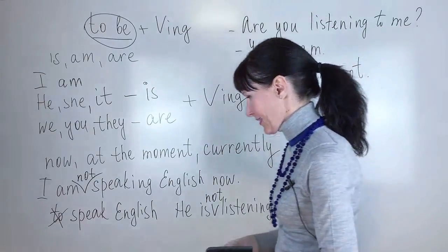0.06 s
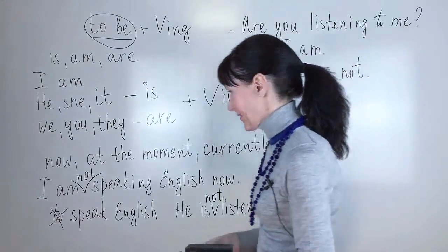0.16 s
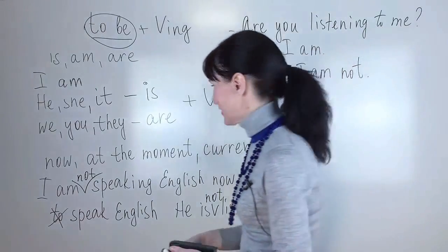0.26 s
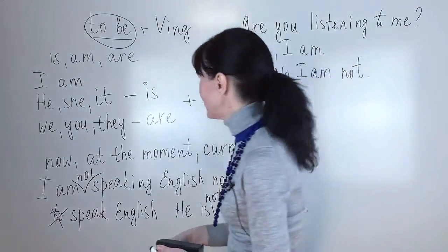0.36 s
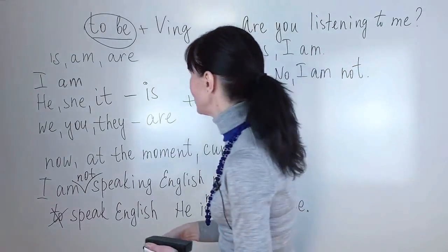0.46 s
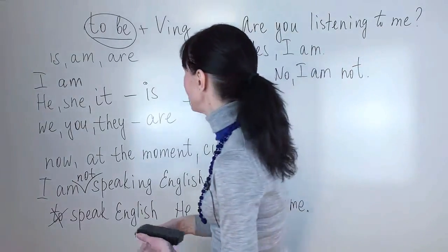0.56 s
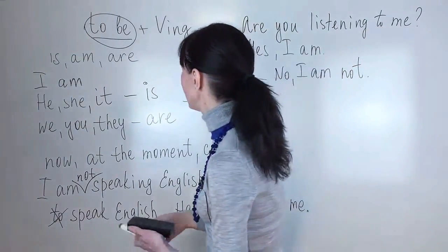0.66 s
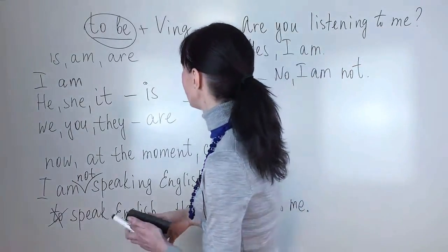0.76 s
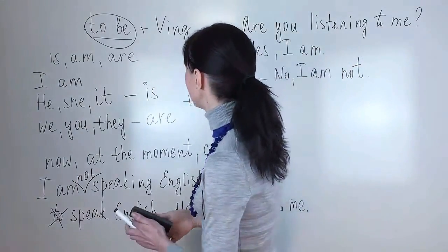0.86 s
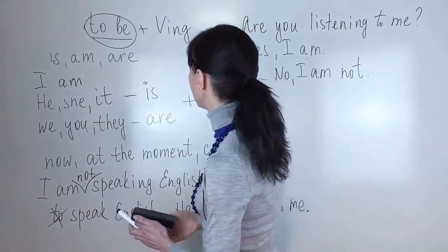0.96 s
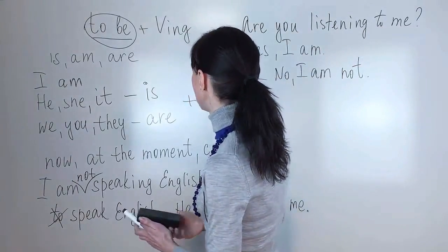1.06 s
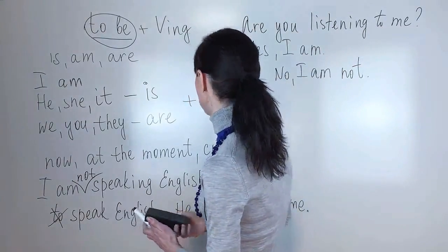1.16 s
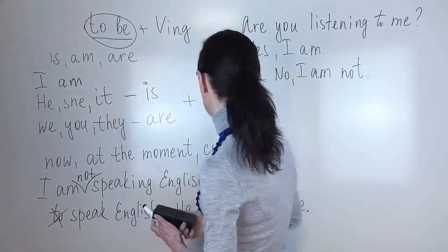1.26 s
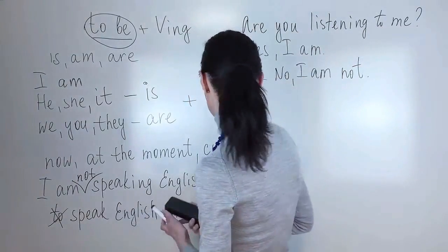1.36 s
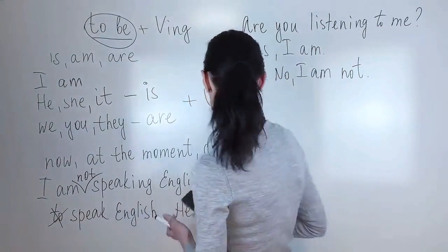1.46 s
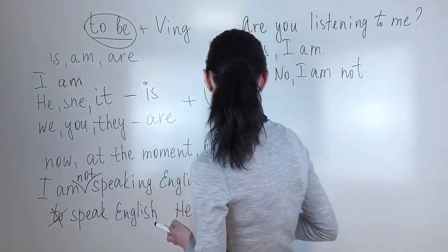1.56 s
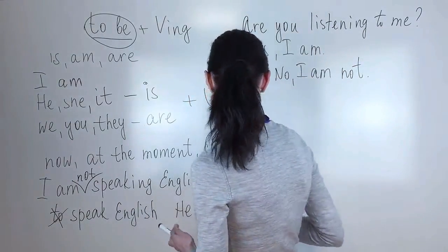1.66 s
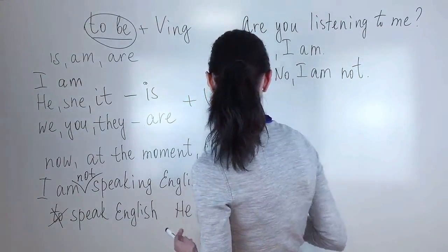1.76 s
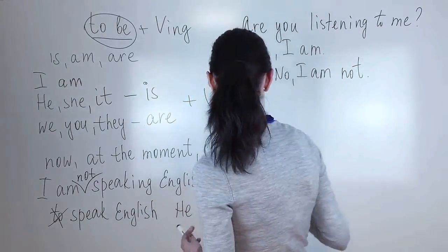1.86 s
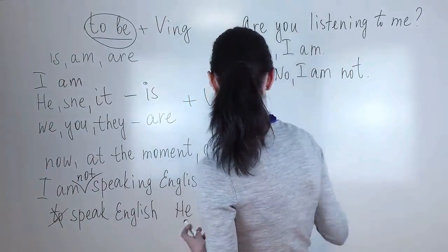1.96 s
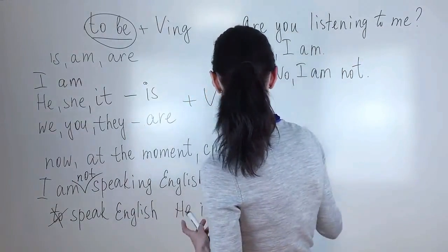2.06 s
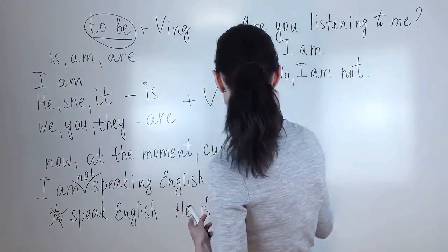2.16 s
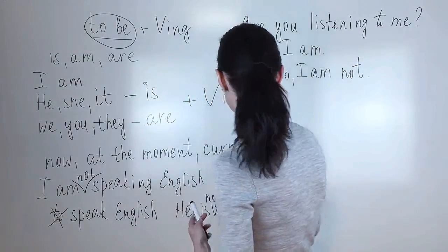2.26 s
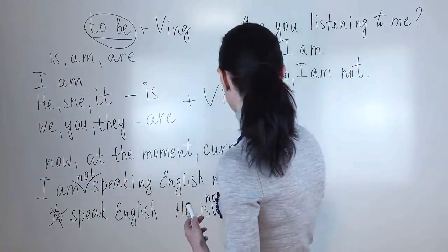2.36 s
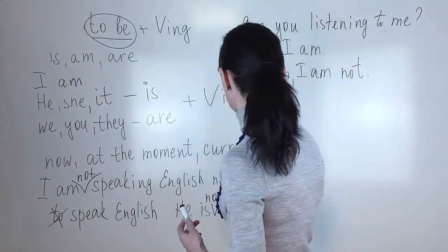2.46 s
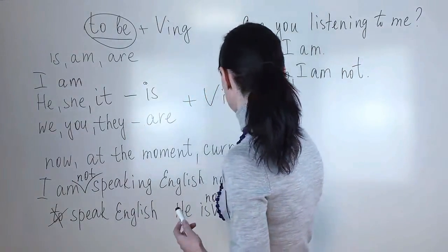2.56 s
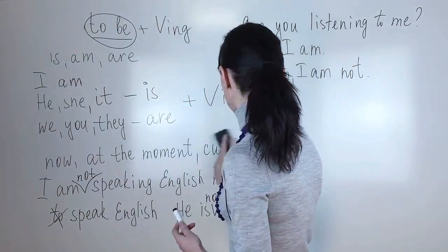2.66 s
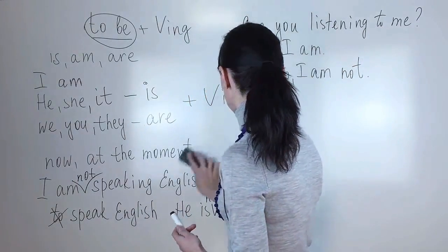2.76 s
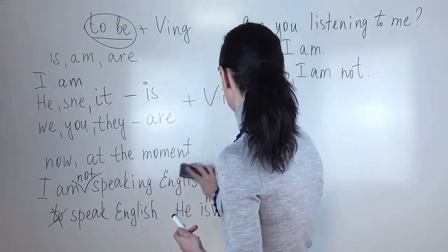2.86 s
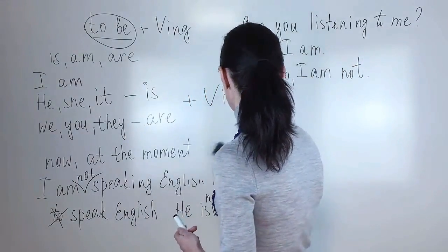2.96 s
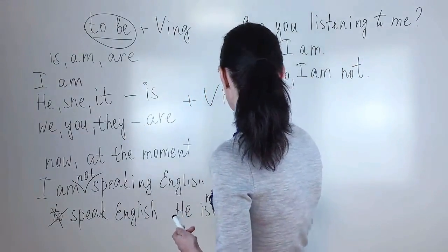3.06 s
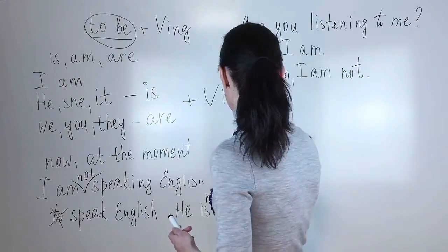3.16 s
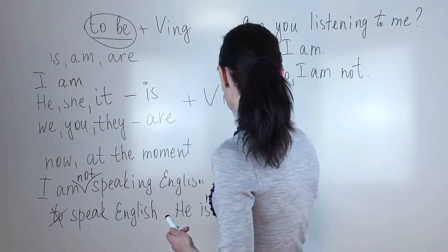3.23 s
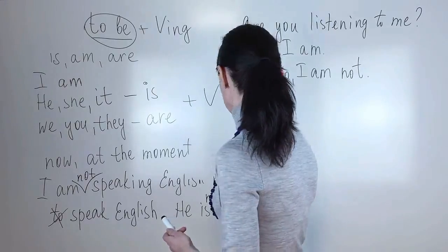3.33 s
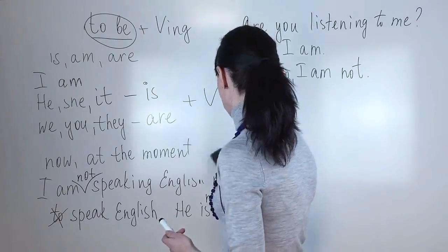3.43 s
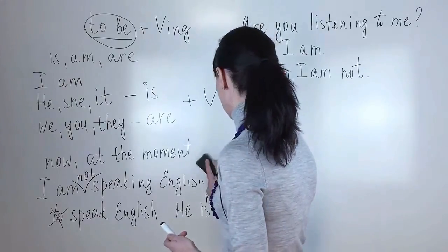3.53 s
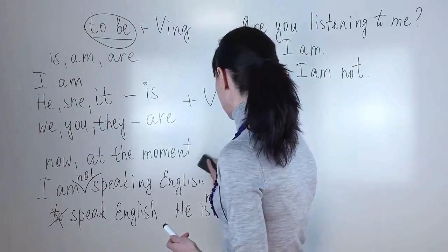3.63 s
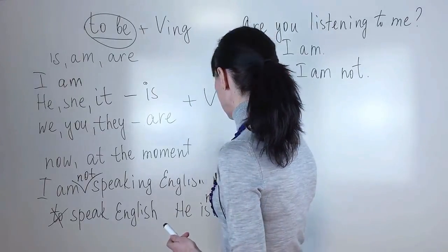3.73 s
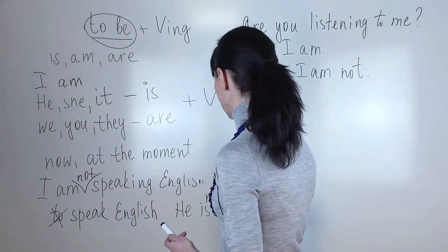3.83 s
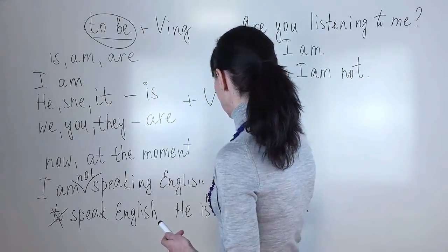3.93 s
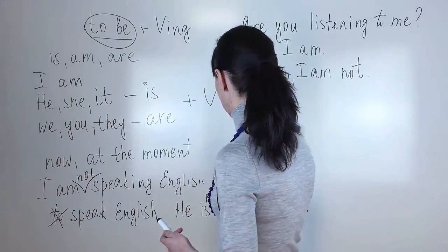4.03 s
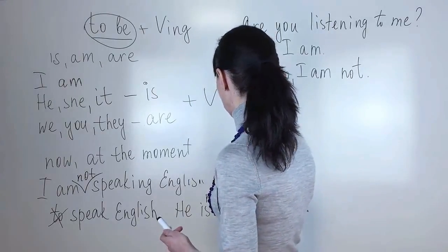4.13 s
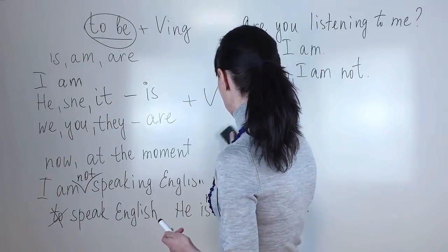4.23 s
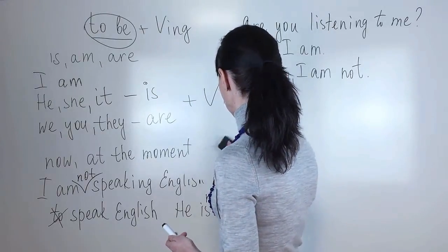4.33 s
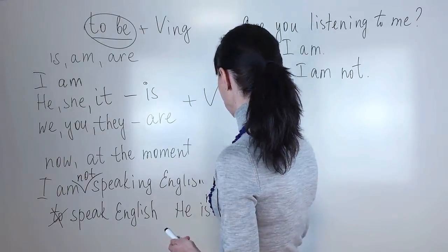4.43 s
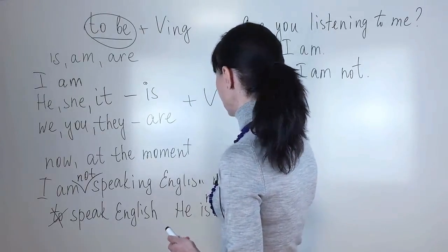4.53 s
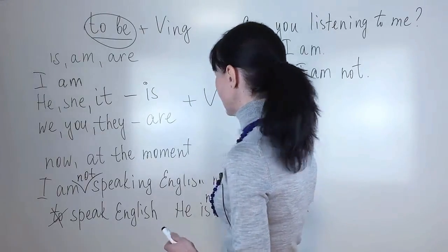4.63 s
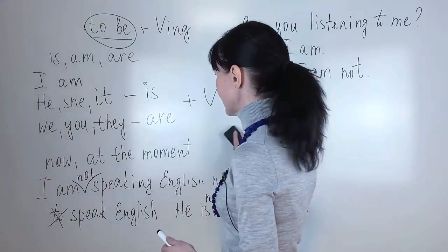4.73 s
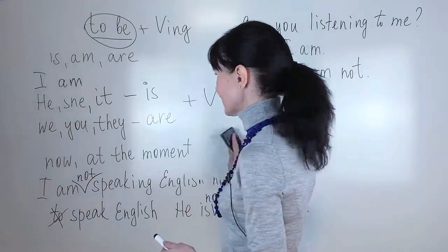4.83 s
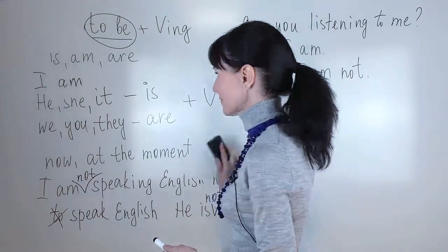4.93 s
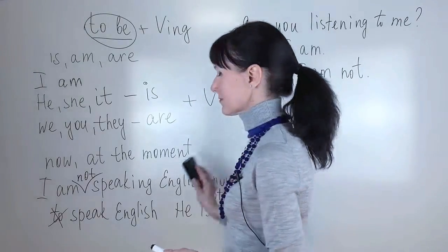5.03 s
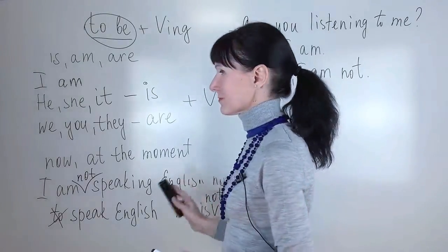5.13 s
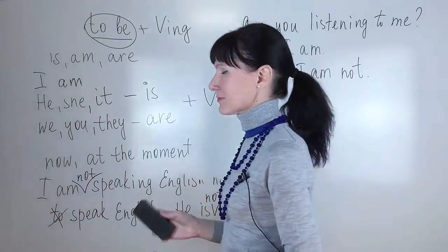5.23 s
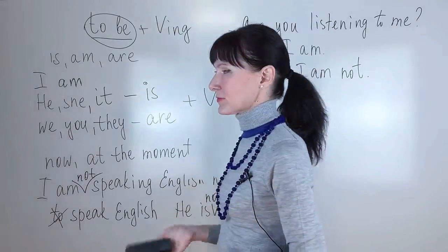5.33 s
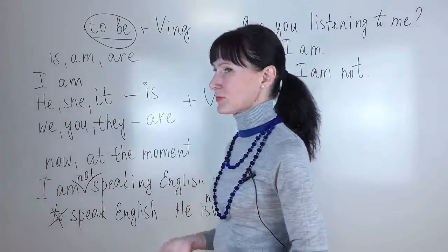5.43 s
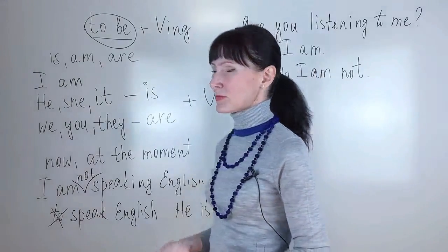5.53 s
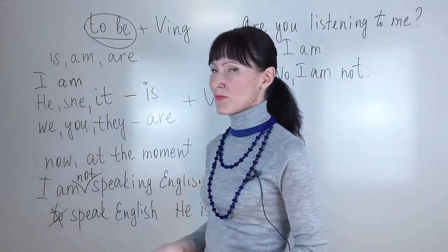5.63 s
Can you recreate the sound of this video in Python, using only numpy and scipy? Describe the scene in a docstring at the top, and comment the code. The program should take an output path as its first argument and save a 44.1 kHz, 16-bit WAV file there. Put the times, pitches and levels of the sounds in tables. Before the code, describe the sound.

After two sharp marker clicks and faint sweater rustling, a felt eraser thumps onto a whiteboard and rubs softly to and fro.

```python
"""First a plastic marker clicks in someone's hand while a sweater rustles and necklace beads tink.
Then an eraser knocks against a whiteboard, which booms briefly, and its felt hisses to and fro in
seven strokes as the fibres slip on the board. A few faint clicks and tinks follow.
It is all heard in a classroom through a clip-on microphone, over a low building rumble,
mains hum and faint hiss."""
import sys
import numpy as np
from scipy import signal
from scipy.fft import rfft, irfft, next_fast_len
from scipy.io import wavfile
from scipy.ndimage import uniform_filter1d, map_coordinates

SR = 44100
rng = np.random.default_rng(int(sys.argv[2]) if len(sys.argv) > 2 else 0)


def to_wav(sig):
    """Store sig (one row per channel, or 1-D mono) as 16-bit WAV at the path in sys.argv[1].

    Samples outside -1..1 are clipped; the rate is SR.
    """
    pcm = np.clip(np.atleast_2d(sig), -1, 1) * 32767
    pcm = np.round(pcm).astype(np.int16)
    wavfile.write(sys.argv[1], SR, pcm.T)  # frames by channels


N = 250840

# How long the room echoes: f/Hz, t60/s (the time to fade by 60 dB)
ROOM_DECAY = [(150, 0.34), (1500, 0.31), (5000, 0.39), (14000, 0.26)]
# Tone colours of the faint hiss and the deep draft: f/Hz, level/dB
HISS_COLOUR = [(60, -5), (80, -13.5), (130, -14.5), (250, -22), (500, -25), (1000, -29.5), (2300, -33),
               (4500, -37), (9000, -38.5), (15000, -40.5)]
DRAFT_COLOUR = [(3, -6.5), (13, 6.5), (20, -4.5), (40, -16.5), (54, -15), (66, -33), (110, -43),
                (300, -100)]
# Swells of the building rumble: middle t/s, length/s, level/dB
RUMBLE_SWELLS = [(1.17, 0.38, -51), (1.76, 0.25, -52.5), (4.58, 0.33, -46.5)]

# The sweater brushing near the microphone: middle t/s, length/s, level/dB
SWEATER_SWISHES = [(.06, 0.089, -61.5), (.31, 0.11, -69), (.415, 0.22, -63), (.555, .06, -62),
                   (.705, 0.22, -58), (1.215, .22, -68), (1.472, 0.033, -68), (1.527, 0.098, -63)]
# The body softly bumping the microphone: t/s, level/dB
BODY_BUMPS = [(.03, -57.5), (0.641, -60), (0.848, -59.5), (1.403, -56.5), (1.658, -63.5), (5.091, -67)]
# Tone colours of the wool and the bumps: f/Hz, level/dB
WOOL_COLOUR = [(100, -11), (400, 4.5), (800, 3), (1300, 3.5), (2600, 1), (4200, -2), (7700, -2),
               (9500, -6.5), (15000, -8)]
BUMP_COLOUR = [(50, 9.5), (170, 12), (500, 0), (1500, -14), (5000, -64)]

# Beads touching the necklace's metal pendant: t/s, level/dB, extra tone f/Hz
PENDANT_TOUCHES = [(1.8746, -62, 5160), (5.062, -58.5, 4590)]
# Runs of beads ticking together: start t/s, length/s, level/dB
BEAD_RUNS = [(0.499, .01, -51), (1.6, .27, -56), (5.413, .01, -49.5)]
# Modes (the tones a struck thing rings with) of the pendant and a bead: f/Hz, level/dB, t60/s
PENDANT_MODES = [(4170, -9, 0.24), (4330, -2, .1), (6220, -9, 0.16), (7445, -11, 0.13), (8300, -9, 0.11),
                 (11490, -2, 0.28)]
BEAD_MODES = [(9300, -6.5, 0.0032), (10800, -4, 0.0074), (12700, -9, 0.0054)]

# Marker clicks: t/s, level/dB, rim snap offset/dB, barrel pitch ratio (set by the fingers' grip)
MARKER_CLICKS = [(0.046, -46.5, -18, 1.44), (0.1488, -22.5, -14.5, 0.96), (0.3725, -51, -12, 0.57),
                 (.4700, -44.5, -10, 1.1), (0.4863, -28, -3.5, 0.973), (0.637, -46.5, -7, 0.77),
                 (1.316, -50.5, -7, 1.05), (1.3697, -47.5, -1, 1.9), (4.8061, -50, -6, 0.88),
                 (5.3572, -52.5, -12, 0.69), (5.377, -50.5, -5, 1.03), (5.387, -52, -9, 1.6),
                 (5.663, -49, -11, 0.6), (5.6745, -53, -12, 1.5)]
# Modes of the marker's hollow barrel and stiff rim: f/Hz, level/dB, t60/s
BARREL_MODES = [(1160, -11.5, 0.014), (1510, -0.5, 0.01), (1990, -17.5, 0.015)]
RIM_MODES = [(3500, -1, 0.0053), (4100, -3.5, 0.0049), (4900, -26, 0.0067), (6000, -25, 0.012),
             (12700, -4, 0.0013)]

# The eraser hitting the board: t/s, level/dB, contact time/s
ERASER_KNOCKS = [(2.2020, -31.5, 0.0012), (2.2092, -26, 0.0022), (2.2141, -36, 0.00096),
                 (2.2455, -45, 0.0011), (2.2528, -42, 0.00084)]
# The whiteboard's low modes: f/Hz, level/dB, t60/s
BOARD_MODES = [(113.4, -23.5, 0.45), (153, -8, 0.073), (184, -10, 0.16), (270, -8, 0.082), (316, -5, 0.13),
               (387.8, -2.5, 0.22), (404.6, 1.5, 0.24), (418.5, -13, 0.54), (435.6, -10.5, 0.37),
               (525.6, 2.5, 0.35), (565, -16, 0.27), (623, -24, 0.33), (663, -14.5, 0.36), (728, -19, 0.18),
               (820, -18.5, 0.17)]
# Tone colour of its other modes, too crowded to hear one by one: f/Hz, level/dB
SHUDDER_COLOUR = [(120, 0), (280, -2), (560, 4), (780, -2.5), (1050, -7.5), (1400, -13.5), (1950, -14),
                  (3000, -23.5), (6000, -24.5), (15000, -40)]

# Tone colour of rubbing felt: f/Hz, level/dB
FELT_COLOUR = [(150, -62), (400, -22.5), (800, -14.5), (1300, -17), (2300, -15.5), (3200, -9), (5300, -6.5),
               (6300, -5), (7200, -1), (8000, -1.5), (9400, -8), (13500, -7), (15500, -11)]
# Where the whiteboard rings under the sliding eraser: f/Hz, width/Hz, level/dB
PANEL_PEAKS = [(476, 40, 0), (594, 110, -9), (830, 220, -14)]
# Eraser strokes: start t/s, end t/s, level/dB, speeding up/s, slowing down/s,
# the pad's starting f/Hz, its ring offset/dB
ERASER_STROKES = [(2.30, 2.875, -54.5, .30, 0.13, 4350, 1), (2.825, 3.19, -54.5, 0.2, .09, 4130, 3),
                  (3.155, 3.565, -54, 0.15, 0.067, 4700, 1), (3.605, 3.99, -55.5, 0.15, 0.074, 4000, 2),
                  (3.99, 4.345, -54, 0.13, 0.11, 4350, 0), (4.305, 4.55, -58, 0.1, 0.054, 4150, 2.5),
                  (4.55, 4.80, -57.5, 0.085, 0.083, 4870, 1)]


def amp(db):
    """Turn decibels into a gain to multiply by."""
    return 10 ** (np.asarray(db) / 20)


def unit(x):
    """Scale x to an average strength (rms) of 1."""
    return x / np.sqrt(np.mean(x ** 2) + 1e-20)


def along(points, hz):
    """Read between (f/Hz, value) points on a log frequency axis."""
    freqs, values = np.transpose(points)
    return np.interp(np.log(hz + 1), np.log(freqs + 1), values)


def wobble(rate):
    """A smooth curve through `rate` random values a second."""
    values = rng.standard_normal(int(N * rate / SR) + 4)
    return map_coordinates(values, [np.arange(N) * rate / SR])


def movement(start, end, rise_s, fall_s):
    """Speed, from 0 to 1, of a movement that gathers pace, holds and slows to rest."""
    t = np.arange(N) / SR
    ease = lambda u: np.sin(np.pi / 2 * np.clip(u, 0, 1))
    return ease((t - start) / rise_s) * ease((end - t) / fall_s)


def swells(rows):
    """Smooth humps of gain, one for each (middle t/s, length/s, level/dB) row."""
    t = np.arange(N) / SR
    return sum(amp(db) * np.cos(np.pi * np.clip((t - middle) / length, -.5, .5)) ** 2
               for middle, length, db in rows)


def filtered(x, response):
    """Multiply each frequency in x by response(hz)."""
    size = next_fast_len(N + SR // 2)
    return irfft(rfft(x, size) * response(np.fft.rfftfreq(size, 1 / SR)), size)[:N]


def coloured(x, colour):
    """Give x a tone colour made of (f/Hz, level/dB) points."""
    return filtered(x, lambda hz: amp(along(colour, hz)))


def band(x, lo_hz, hi_hz):
    """Gently turn down what lies outside a band."""
    return signal.sosfilt(signal.butter(2, [lo_hz, hi_hz], "bandpass", fs=SR, output="sos"), x)


def noise(colour):
    """Noise of rms 1 with the given tone colour."""
    return unit(coloured(rng.standard_normal(N), colour))


def resonant(peaks):
    """Noise of rms 1 ringing in steep-sided (f/Hz, width/Hz, level/dB) peaks."""
    def response(f):
        return sum(amp(db) * (1j * f * width / (hz * hz - f * f + 1j * f * width)) ** 2
                   for hz, width, db in peaks)
    return unit(filtered(rng.standard_normal(N), response))


def gliding(centre_hz, width_hz):
    """Noise of rms 1 with one peak that follows centre_hz."""
    hz, t, spectra = signal.stft(rng.standard_normal(N), SR, nperseg=512)
    offset_hz = hz[:, None] - np.interp(t, np.arange(N) / SR, centre_hz)
    peak = 1 / (1 + (2 * offset_hz / width_hz) ** 2)
    return unit(signal.istft(spectra * peak, SR, nperseg=512)[1][:N])


def patchy(x, depth_db):
    """Give x faint, randomly drifting peaks and dips, so its hiss sounds uneven."""
    spectra = signal.stft(x, nperseg=512)[2]
    patches = uniform_filter1d(rng.standard_normal(spectra.shape), size=3, axis=0)  # smooth in pitch
    patches = uniform_filter1d(patches, size=24, axis=1)  # and in time
    return unit(signal.istft(spectra * amp(depth_db * unit(patches)), nperseg=512)[1][:N])


def drone(hz, drift):
    """A tone of rms 1 whose phase wanders by about `drift` radians."""
    return np.sqrt(2) * np.sin(2 * np.pi * hz * np.arange(N) / SR + drift * wobble(rate=4.7))


def ring(modes):
    """One second of fading modes; the surface's speed makes the sound, so little lies below them."""
    t = np.arange(SR) / SR
    return sum(amp(db - 60 * t / t60) * np.cos(2 * np.pi * hz * t)
               * (1 - np.exp(-2 * np.pi * hz * t)) ** .5 for hz, db, t60 in modes)


def burst(t60):
    """One second of white noise dying away."""
    return amp(-60 * np.arange(SR) / SR / t60) * rng.standard_normal(SR)


def add(track, start, sound):
    """Mix a sound into the track at `start` seconds."""
    part = track[max(round(start * SR), 0):][:len(sound)]
    part += sound[:len(part)]


def in_room(x, echo_db):
    """The direct sound plus the classroom's short echo, whose highest treble dies first."""
    hz, t, spectra = signal.stft(rng.standard_normal(SR // 2), SR, nperseg=256)
    fade = amp(-60 * t / along(ROOM_DECAY, hz)[:, None])
    echo = signal.istft(spectra * fade, SR, nperseg=256)[1]
    echo *= 1 - np.exp(-np.arange(len(echo)) / SR / 0.00084)  # the walls take a moment to answer
    return x + amp(echo_db) * signal.fftconvolve(x, echo / np.linalg.norm(echo))[:N]


def background():
    """A swelling building rumble, mains hum, a slow draft and an even hiss."""
    rumble_gain = amp(-54.5 + 2.5 * wobble(rate=4.134)) + swells(RUMBLE_SWELLS)
    rumble = rumble_gain * drone(hz=30.1, drift=0.76)
    hum = amp(-56 + 1.5 * wobble(rate=3.1)) * drone(hz=49.3, drift=0.068)
    return rumble + hum + amp(-48.5) * noise(DRAFT_COLOUR) + amp(-62) * noise(HISS_COLOUR)


def sweater():
    """Wool rustles unevenly as the body turns and now and then nudges the microphone."""
    turning = amp(-74) * movement(start=-0.13, end=2.01, rise_s=0.13, fall_s=0.13)
    brushing = np.hypot(turning, swells(SWEATER_SWISHES))
    flicker = amp(2.2 * wobble(rate=140))
    rustle = brushing * flicker * patchy(noise(WOOL_COLOUR), depth_db=3)
    bumps = np.zeros(N)
    bump_t60 = 0.44
    for start, db in BODY_BUMPS:
        add(bumps, start, amp(db - 60 * np.arange(SR) / SR / bump_t60))
    return rustle + bumps * noise(BUMP_COLOUR)


def necklace():
    """The necklace swings: its jostled metal pendant rings faintly and beads tick together."""
    tinks = np.zeros(N)
    soft_start = 1 - np.exp(-np.arange(SR) / SR / 0.0027)
    for start, db, hz in PENDANT_TOUCHES:
        metal = ring(PENDANT_MODES + [(hz, -5, .18)])
        jostle = amp(5) * burst(t60=0.083)
        add(tinks, start, amp(db) * soft_start * (metal + jostle))
    mean_gap_s, scatter_db = 0.053, 4
    for start, length, db in BEAD_RUNS:
        t = start
        while t < start + length:
            add(tinks, t, amp(db + scatter_db * rng.standard_normal()) * ring(BEAD_MODES))
            t += mean_gap_s * (.5 + rng.random())
    return in_room(band(tinks, lo_hz=2730, hi_hz=14900), echo_db=-1.5)


def marker():
    """Each small plastic contact pops the marker's hollow barrel and snaps its stiff rim."""
    barrel, rim = np.zeros(N), np.zeros(N)
    for start, db, snap_db, pitch in MARKER_CLICKS:
        held_modes = [(hz * pitch, level, t60) for hz, level, t60 in BARREL_MODES]
        add(barrel, start, amp(db) * ring(held_modes))
        add(rim, start, amp(db + snap_db) * (ring(RIM_MODES) + amp(-20.5) * burst(t60=0.02)))
    # so small a thing gives off little bass, and the fingers muffle its treble
    barrel = band(barrel, lo_hz=690, hi_hz=2260)
    rim = band(rim, lo_hz=2850, hi_hz=11600)
    return in_room(barrel, echo_db=-6.5) + in_room(rim, echo_db=-10.5)


def eraser_knock():
    """The eraser lands edge first, slaps flat and rocks, making the board boom and shudder."""
    boom, shudder = np.zeros(N), np.zeros(N)
    board = ring(BOARD_MODES)
    t = np.arange(-(SR // 500), SR // 500) / SR
    for hit_s, db, contact_s in ERASER_KNOCKS:
        push = np.exp(-8 * (t / contact_s) ** 2)  # the soft face rounds off each blow
        add(boom, hit_s + t[0], amp(db) * signal.fftconvolve(board, push / push.sum()))
    shake = amp(-30.5) * burst(t60=0.21)
    first_tap = amp(-20) * burst(t60=0.011)
    add(shudder, ERASER_KNOCKS[0][0], shake + first_tap)
    return in_room(boom + coloured(shudder, SHUDDER_COLOUR), echo_db=-8)


def hand_strokes():
    """Rubbing strength, pad pitch and pad ring: the pitch climbs as a stroke presses on, then resets."""
    t = np.arange(N) / SR
    climb_hz_per_s = 2100
    # while on the board the felt never quite rests, even as the hand turns
    creep = amp(-66) * movement(start=2.235, end=4.86, rise_s=0.018, fall_s=0.15)
    power = creep ** 2
    pad_hz, pad_db = np.full(N, float(ERASER_STROKES[0][5])), np.zeros(N)
    for start, end, db, rise_s, fall_s, hz, ring_db in ERASER_STROKES:
        power += (amp(db) * movement(start, end, rise_s, fall_s)) ** 2
        pad_hz = np.where(t < start, pad_hz, hz + climb_hz_per_s * (t - start))
        pad_db = np.where(t < start, pad_db, ring_db)
    return np.sqrt(power), pad_hz, pad_db


def eraser_wipe():
    """Countless felt fibres slip on the board: a fine hiss that sets the pad and the whiteboard ringing."""
    strength, pad_hz, pad_db = hand_strokes()
    rubbing = strength * amp(0.52 * wobble(rate=25))
    pad = amp(pad_db - 11.5) * gliding(pad_hz, width_hz=1600)
    hiss = amp(1) * patchy(noise(FELT_COLOUR) + pad, depth_db=1.8)
    panel = amp(-20.5 + wobble(rate=6.57)) * resonant(PANEL_PEAKS)
    return rubbing * (hiss + panel)


def scene():
    """All the sounds reach one microphone, which feeds both channels."""
    mono = eraser_knock() + eraser_wipe() + marker() + necklace() + sweater() + background()
    return np.array([mono, mono])


def record(dry):
    """Cut off the very highest treble."""
    top_hz = 15650
    return np.array([filtered(channel, lambda hz: hz < top_hz) for channel in dry])


dry = scene()
out = record(dry)
to_wav(out)
```